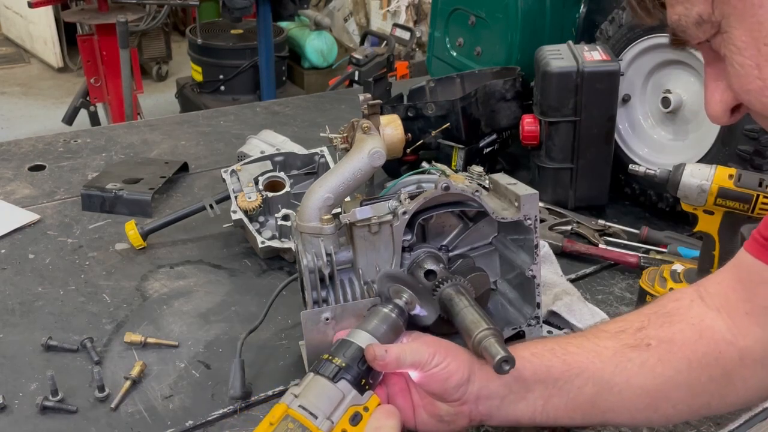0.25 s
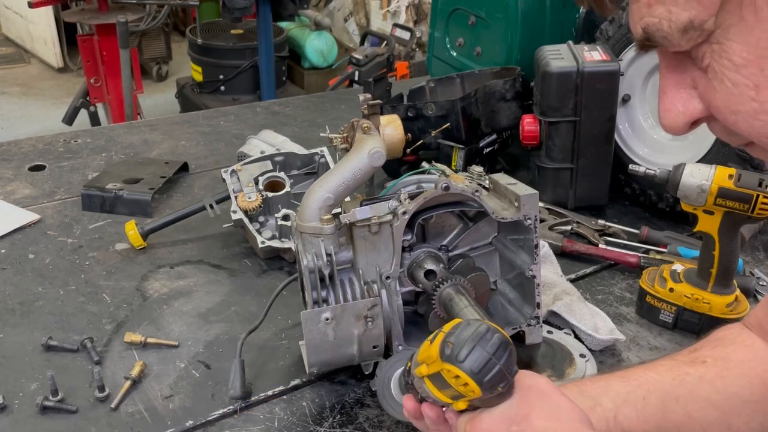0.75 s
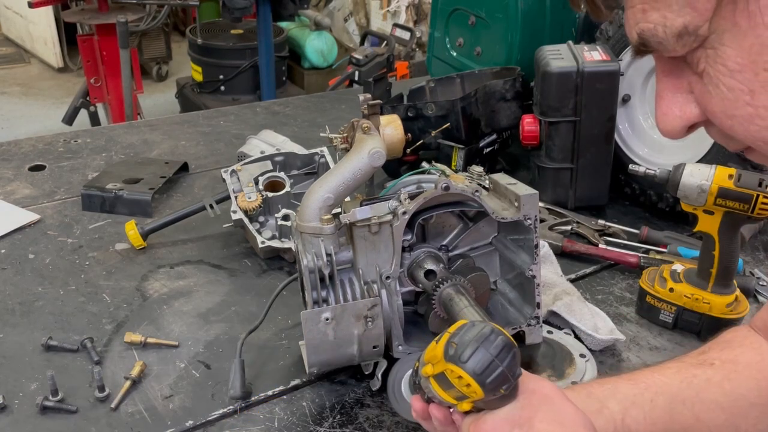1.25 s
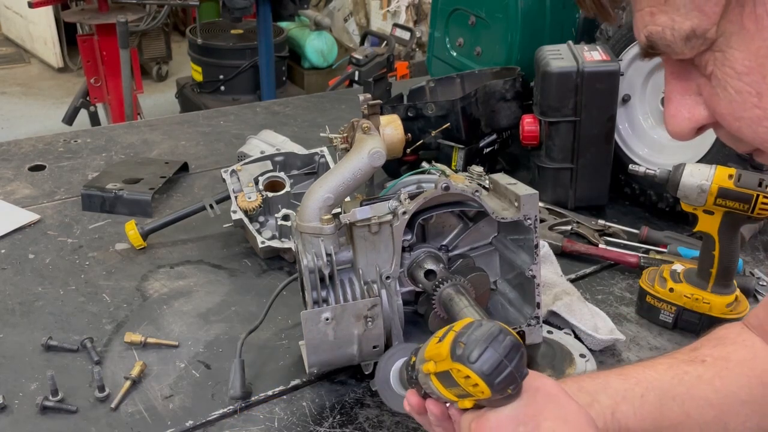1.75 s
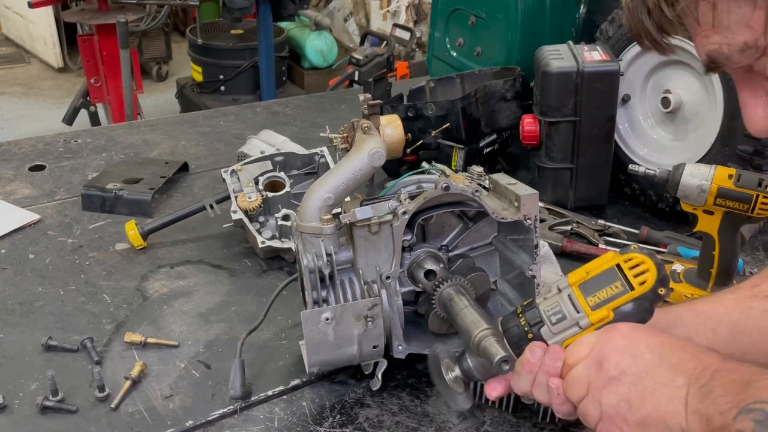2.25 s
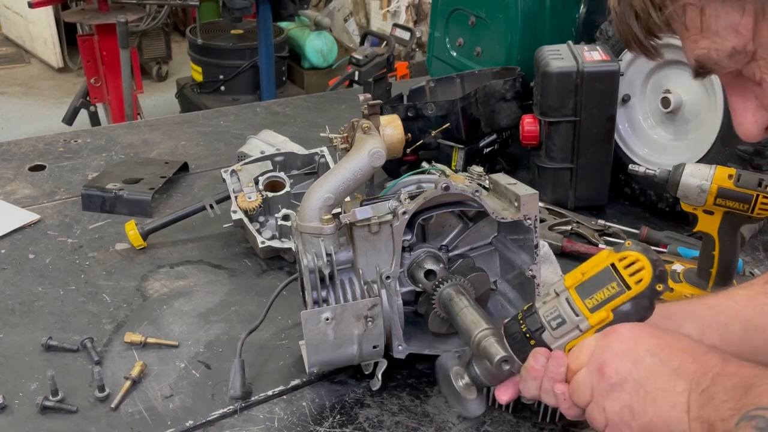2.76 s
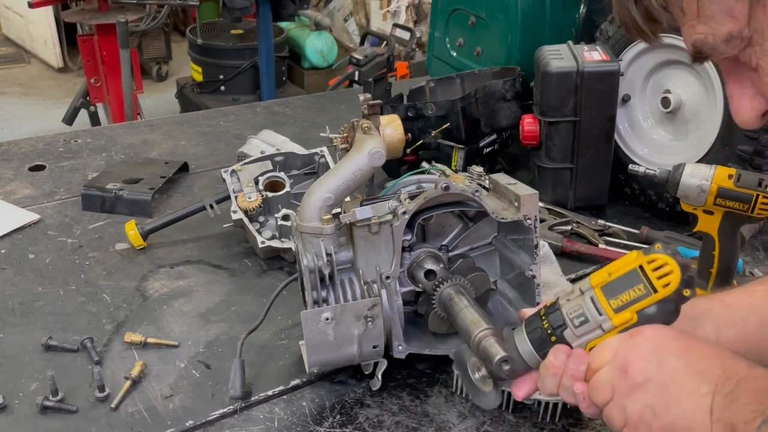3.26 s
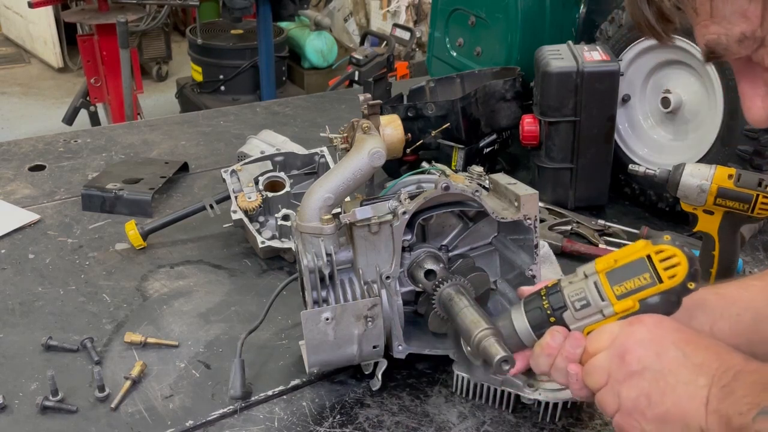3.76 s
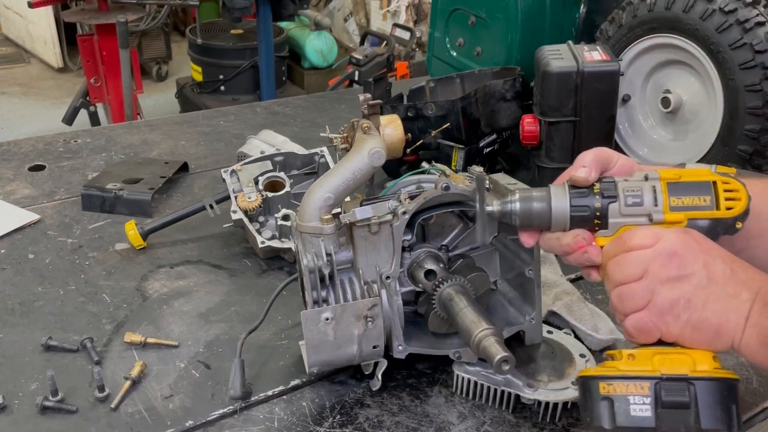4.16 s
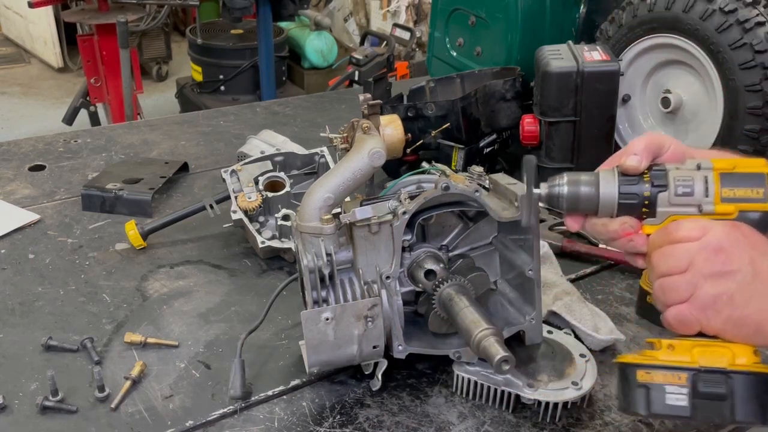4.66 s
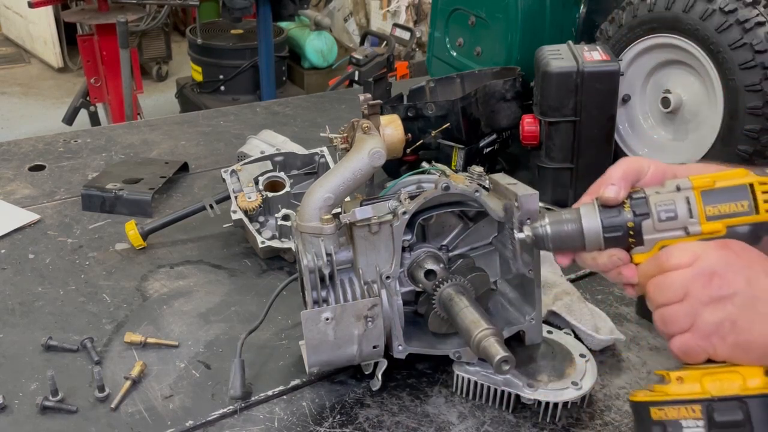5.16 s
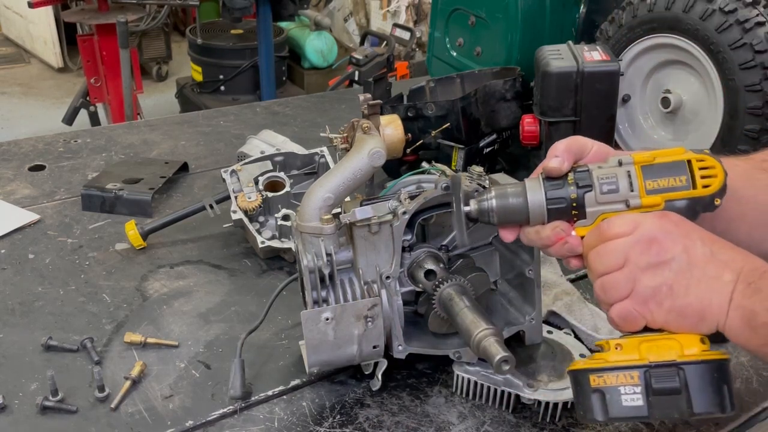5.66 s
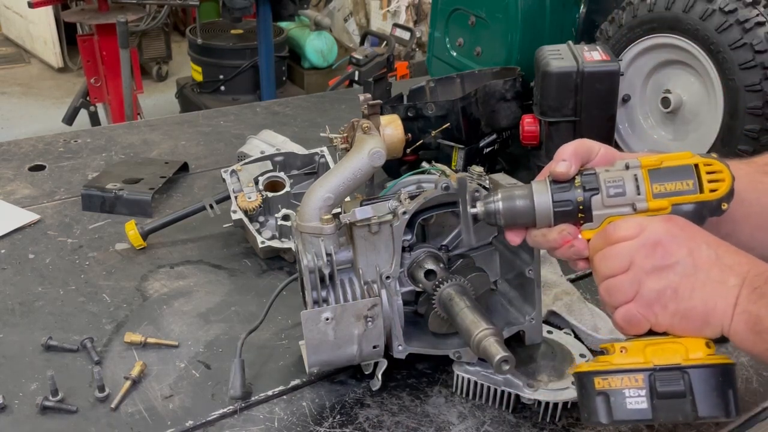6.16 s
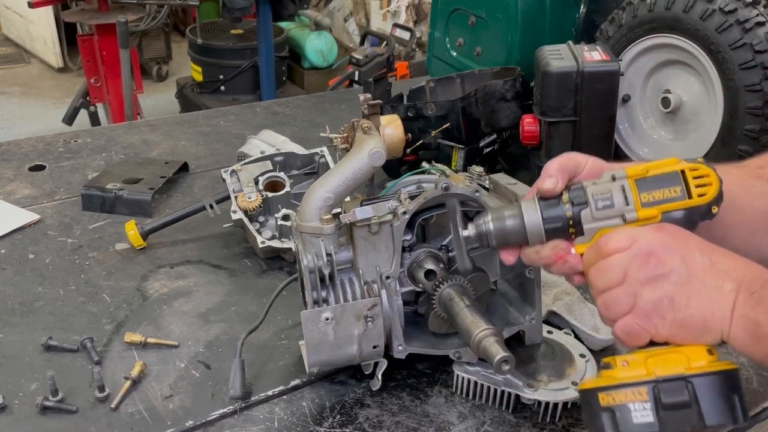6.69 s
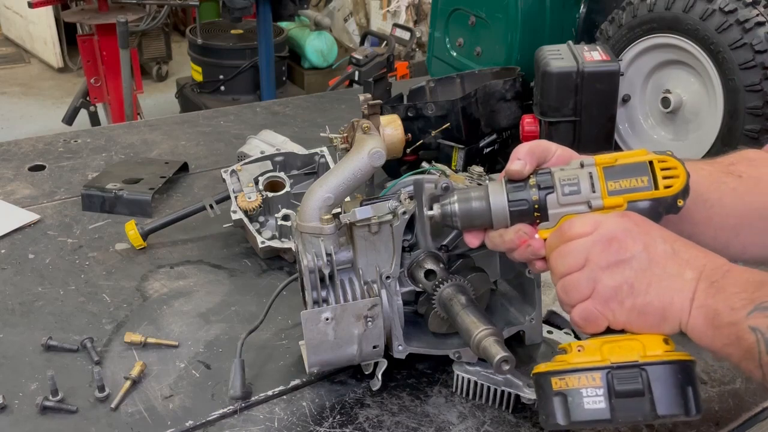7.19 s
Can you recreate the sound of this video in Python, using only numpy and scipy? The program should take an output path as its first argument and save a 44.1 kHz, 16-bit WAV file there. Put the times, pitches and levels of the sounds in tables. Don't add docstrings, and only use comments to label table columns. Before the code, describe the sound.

Close workshop sound of a whirring drill and raspy wire brush on metal, shifting in pitch and pressure, braking to near silence, then scrubbing again loudly.

```python
import sys
import numpy as np
from scipy import signal
from scipy.fft import rfft, irfft, next_fast_len
from scipy.io import wavfile
from scipy.ndimage import uniform_filter1d, map_coordinates

SR = 44100
rng = np.random.default_rng(int(sys.argv[2]) if len(sys.argv) > 2 else 0)


def how_loud(loudness_db):
    steps = np.asarray(loudness_db, float) / 20
    return 10 ** steps


def materialize(psi):
    bounded = np.clip(np.atleast_2d(psi).T, -1, 1)
    quanta = np.round(bounded * 32767).astype(np.int16)
    wavfile.write(sys.argv[1], SR, quanta)


N = 327663
TIME = np.arange(N) / SR
BEFORE_CUT_S, AFTER_CUT_S, BEFORE_NEXT_S, AFTER_NEXT_S = .3605, .3615, 2.1975, 2.1985

# (time [s], wire noise [dB], pressure [dB])
BRUSH = [
    [(0, -28, -18.5), (.15, -31, -20.5), (0.16, -33.5, -22.5), (BEFORE_CUT_S, -33, -24.5)],
    [(AFTER_CUT_S, -22, -7.5), (.5, -17, -15), (1.3, -15.5, -15.5), (1.62, -16.5, -18), (1.865, -18, -23),
     (2.02, -23, -18.5), (2.113, -26.5, -17), (BEFORE_NEXT_S, -32.5, -10)],
    [(AFTER_NEXT_S, -33, -14), (2.9, -33, -15), (3.04, -33.5, -10.5), (3.1, -32.5, -19), (3.42, -32, -15.5),
     (3.55, -32.5, -16), (3.77, -33, -10), (4.0, -33, -16.5), (4.09, -33.5, -12.5)],
    [(4.1, -32.5, -18), (4.48, -31.5, -16), (4.58, -33, -7.5), (4.72, -31.5, -12.5), (4.81, -32, -15.5),
     (4.96, -31.5, -20), (5.04, -37.5, -9.5)],
    [(5.582, -29.5, -11.5), (5.61, -29, -5), (5.635, -17, -14.5), (5.68, -13.5, -18.5), (6.0, -12.5, -17.5),
     (6.88, -13, -19.5), (7.1, -20, -20.5), (7.22, -23, -18.5), (7.43, -27.5, -18)],
]
# (time [s], rate [Hz])
SPEED = [
    [(0, 1263), (.1, 1238), (.2, 1334), (.28, 1431), (BEFORE_CUT_S, 1496)],
    [(AFTER_CUT_S, 700), (.385, 850), (.41, 925), (.5, 1090), (.6, 1232), (.68, 1300), (.9, 1310),
     (.96, 1294), (1.11, 1335), (1.22, 1326), (1.31, 1307), (1.5, 1324), (1.66, 1342), (1.8, 1350),
     (1.95, 1314), (2.07, 1285), (BEFORE_NEXT_S, 1262)],
    [(AFTER_NEXT_S, 1090), (2.3, 1090), (2.44, 1092), (2.53, 1048), (2.62, 1026), (2.8, 1003), (2.92, 970),
     (3.03, 948), (3.17, 1098), (3.27, 1200), (3.34, 1245), (3.42, 1225), (3.5, 1262), (3.6, 1318),
     (3.7, 1332), (3.78, 1315), (3.88, 1255), (4.09, 1320)],
    [(4.1, 1210), (4.3, 1170), (4.5, 1149), (4.6, 1066), (4.72, 1026), (4.77, 1114), (4.82, 1158),
     (4.87, 1107), (4.94, 985), (5.0, 895), (5.032, 850)],
    [(5.58, 415.5), (5.615, 640), (5.648, 925), (5.7, 1104), (5.75, 1215), (5.8, 1280), (5.87, 1337),
     (5.95, 1359), (6.4, 1359), (6.7, 1375), (6.9, 1420), (7.05, 1452), (7.2, 1424), (7.43, 1359)],
]
# (frequency [Hz], density [dB per Hz])
HANDLE_RUMBLE = [(20, -16), (60, -16.5), (150, -5), (300, -1.5), (520, 0), (700, -33.5)]
RATTLE = [(310, -33.5), (520, -11.5), (1340, -1.5), (1800, -9), (2220, -12), (2590, -4.5), (3300, -6),
          (3900, -5.5), (6600, -120)]
SCRUB = [(1180, -23.5), (2000, -11.5), (2270, -13.5), (2600, -2.5), (2890, -16.5), (3840, -4), (4660, -6),
         (5210, 2), (6600, 3.5), (10500, -6), (13600, -21), (22000, -120)]
WIRE_TIPS = [(5000, -49.5), (8500, -4.5), (10400, -4.5), (13800, 2), (14700, 6.5), (15300, 3.5),
             (15700, -10)]
SCRUB_OVER = [-1, -4, -7, -8, -6]
RUMBLE_OVER = [-30.5, -31, -27.5, -26.5, -33]
FROM_REST = [0, 1, 0, 0, 1]
# (echo [dB], t60 [s], floor [dB], creep of the squeezed trigger [dB])
PAUSE = [(-63, 0.32, -87.5, -74.5), (-58, 0.37, -87, -65.5), (-56, 0.33, -92, -64.5),
         (-49, 0.19, -101, -59)]
# (time [s], half length [s], frequency [Hz], width [Hz], share lost
THINNED = [(1.88, 0.32, 3200, 400, .6), (1.95, .3, 800, 270, .4), (0.64, 0.27, 4800, 500, .3),
           (2.3, 0.23, 2100, 560, 0.45), (1.78, .15, 1950, 300, .5), (7.28, .12, 3500, 400, .5),
           (7.36, .12, 2000, 350, .5), (7.1, .08, 700, 250, .5), (.29, .09, 10800, 1200, .4),
           (5.95, .15, 6100, 500, .3), (4.48, .12, 6300, 700, .3)]

GRIP = [(-39.5, -52, -41, -27, -40, -36), (-34, -36.5, -37, -32, -20.5, -29),
        (-41, -59, -39, -36.5, -45, -43), (-41.5, -43, -41.5, -40.5, -42.5, -47),
        (-37.5, -34.5, -36, -30.5, -35, -34)]
# (frequency [Hz], width [Hz], gain [dB])
HOUSING = [(941, 120, 14.5), (2700, 210, 4), (6700, 450, 5.5)]
# (time [s], half length [s], level [dB])
LOW_BITES = [
    [(.05, 0.14, -47), (.33, 0.042, -50), (.375, 0.015, -35), (.418, 0.04, -29), (.97, 0.14, -38.5),
     (2.75, 0.31, -42), (3.04, 0.073, -38), (3.45, 0.072, -44.5), (3.85, 0.088, -40.5), (4.68, 0.18, -37.5),
     (4.962, 0.065, -29), (2.33, 0.14, -48.5), (4.35, 0.19, -49), (5.66, 0.045, -30.5), (6.45, .5, -42),
     (7.28, 0.063, -38.5)],
    [(.03, 0.082, -41), (.39, 0.041, -34), (.47, .05, -40), (3.41, 0.18, -35.5), (3.64, 0.31, -42.5),
     (3.88, 0.17, -36), (4.44, .07, -54), (7.05, .35, -43.5)],
    [(.25, 0.11, -52), (.53, 0.14, -36), (2.3, 0.06, -52), (2.7, 0.27, -43), (2.92, 0.16, -38.5),
     (3.85, .09, -39), (4.2, 0.14, -43.5), (4.68, 0.095, -50), (5.69, .04, -35), (7.0, 0.22, -48),
     (7.2, .08, -44)],
]
HIGH_BITES = [
    [(.05, 0.13, -33), (.4, 0.026, -26), (1.76, 0.2, -26.5), (2.43, 0.14, -39.5), (2.87, 0.31, -39.5),
     (3.88, 0.067, -50), (4.68, 0.1, -33.5), (6.27, .1, -30), (6.9, .12, -38), (7.08, 0.1, -34),
     (7.3, .16, -39)],
    [(1.6, 0.78, -44), (2.95, 0.13, -37), (3.17, .09, -47), (3.3, 0.068, -42), (3.43, .09, -42),
     (3.7, .12, -47), (5.98, .08, -33), (5.81, 0.08, -24.5), (6.27, .12, -29)],
    [(.58, .09, -27), (2.4, 0.29, -39), (3.28, 0.046, -42), (2.7, .12, -45), (4.96, .05, -50),
     (4.82, 0.069, -33), (1.75, .2, -40), (1.1, .5, -34), (5.73, .07, -30)],
]
# (order [no unit], time [s], half length [s], level [dB])
HIGH_ORDERS = [(7, .415, 0.029, -30.5), (8, 0.52, .04, -33), (9, 2.55, .06, -43), (9, 2.82, 0.11, -45),
               (9, 3.1, .05, -43), (8, 3.3, .07, -44), (8, 3.69, 0.17, -37), (7, 5.69, .05, -32),
               (5, 5.66, .04, -32), (4, 5.65, .04, -33), (6, 5.92, .1, -33), (7, 4.95, .05, -46)]
# (level over the rattle [dB], width [Hz])
RIDGES = [(-8.5, 220), (-10, 240), (-8.5, 300)]
RIDGE_OVER = [0, -1, -1, -1, -5]
CHATTER_USUAL = [.75, .52, .47, .5, .5]

# (time [s], frequency [Hz], level [dB])
SWITCH = [
    [(0, 5176, -27.5), (.2, 5230, -29.5), (.356, 5285, -33)],
    [(.41, 5000, -35.5), (.458, 5135, -21), (.542, 5140, -23), (.672, 5102, -25), (.906, 5162, -24.5),
     (.946, 5131, -28), (1.004, 5140, -23.5), (1.05, 5085, -30), (1.19, 5134, -25.5), (1.35, 5100, -28),
     (1.385, 5050, -34), (1.522, 5190, -27), (1.7, 5120, -28), (1.842, 5151, -27.5), (2.028, 5200, -29),
     (2.08, 5110, -31), (2.19, 5070, -34.5)],
    [(2.42, 5080, -56), (2.606, 5100, -39.5), (2.83, 4980, -47), (2.87, 4970, -35), (3.05, 5020, -46),
     (3.124, 4920, -43), (3.27, 5040, -50), (3.45, 5040, -57)],
    [(3.85, 4870, -50), (3.92, 4950, -43), (4.02, 5000, -56), (4.3, 5030, -53)],
    [(4.46, 4720, -48), (4.54, 4800, -50), (4.6, 4960, -38), (4.655, 5020, -28), (4.71, 5100, -28),
     (4.77, 4960, -29), (4.79, 4950, -40)],
    [(5.68, 5010, -36.5), (5.75, 5155, -27.5), (5.86, 5210, -30), (5.92, 5170, -39), (6.3, 5083, -35.5),
     (6.6, 5100, -41.5)],
]
# (time [s], peak [dB], frequency [Hz], length [s])
SQUEEZE = [(5.531, -48, 5650, 0.004), (5.537, -41, 5420, 0.0044), (5.548, -28, 5500, 0.0026),
           (5.557, -36, 5920, 0.004), (5.565, -31, 5800, 0.004), (5.572, -37, 5550, 0.003),
           (5.581, -27.5, 5750, 0.0022), (5.587, -24.5, 5600, 0.0025), (5.595, -30, 6050, 0.003)]

# (time [s], half length [s], frequency [Hz], width [Hz],
# level [dB])
BAND_SWELLS = [(0.095, 0.15, 1440, 290, -44.5), (0.118, 0.14, 2660, 210, -43.5), (6.27, .09, 5400, 243, -29.5),
               (1.94, 0.11, 2200, 260, -42.5), (0.05, .15, 14400, 1100, -29.5), (.28, .09, 15000, 150, -43),
               (.04, .1, 8800, 440, -42), (2.56, 0.12, 4450, 160, -37.5), (1.1, .68, 930, 110, -40.5),
               (2.97, 0.13, 830, 230, -48), (.3, .1, 190, 40, -62.5), (3.45, 0.11, 560, 150, -59.5),
               (2.947, 0.14, 4207, 500, -37.5), (3.42, 0.11, 6100, 350, -38), (3.78, 0.16, 800, 90, -50),
               (5.66, 0.055, 3000, 450, -31), (.06, .11, 4500, 500, -36), (0.055, .1, 3300, 390, -42),
               (1.9, .2, 1300, 200, -41), (3.04, .04, 300, 200, -53), (4.99, .04, 800, 120, -40),
               (2.35, .08, 4300, 200, -41), (2.17, .04, 6300, 390, -34.5), (1.335, .022, 1250, 200, -30),
               (1.335, .03, 930, 80, -35), (1.63, .015, 900, 500, -35), (1.95, .25, 2480, 200, -39),
               (7.3, .16, 5500, 250, -38), (1.69, .03, 950, 100, -39), (5.64, .03, 4200, 500, -32),
               (.3, .07, 13400, 200, -40), (5.031, .012, 5800, 400, -36), (2.95, .2, 350, 150, -58),
               (1.95, .2, 450, 120, -52), (4.67, 0.15, 5150, 330, -29.5), (4.52, .07, 4850, 140, -38.5),
               (2.25, 0.092, 4240, 140, -34.5), (2.5, 0.042, 4230, 170, -34), (2.74, .08, 4100, 260, -39),
               (2.98, 0.14, 990, 45, -38.5), (5.39, .1, 1550, 160, -83), (5.268, 0.005, 1200, 900, -68),
               (6.42, 0.78, 3330, 250, -35)]
MID_HISS_OVER = [-20, -30.5, -14, -15.5, -19.5]

# (time [s], peak [dB], swing [Hz], half length [s])
PUFFS = [(0.61, -22, 50.8, 0.029), (0.644, -18.5, 100, 0.0049), (0.684, -29.5, 84.8, 0.0093),
         (0.722, -29, 53.6, 0.013), (0.806, -22, 120.8, 0.016), (0.895, -25, 75, 0.066),
         (1.036, -24.5, 105, 0.015), (1.093, -23, 45.3, 0.022), (1.187, -27, 50.8, 0.052),
         (1.347, -21.5, 76.8, 0.0073), (1.373, -28.5, 75, 0.003), (1.463, -31.5, 50.8, 0.025),
         (1.567, -38, 81, 0.017), (1.658, -42, 58.8, 0.016), (1.786, -29, 83.3, 0.008),
         (1.817, -26.5, 74.4, 0.023), (1.895, -31, 59, 0.019), (1.953, -31, 54.8, 0.022),
         (2.031, -31, 100, 0.018), (2.113, -22.5, 60, 0.035), (2.175, -23.5, 46, 0.017),
         (2.311, -43, 74.9, 0.029), (2.484, -46, 42.6, 0.014), (2.52, -49, 92.4, 0.0083),
         (2.41, -51, 70, 0.08), (1.52, -39, 60, 0.04), (1.26, -37, 50, 0.03), (1.76, -36, 50, 0.02)]

# (time [s], peak [dB])
KNOCKS = [
    (6.2, -22),
    (5.028, -26),
    (5.063, -39),
]
# (frequency [Hz], width [Hz], level [dB])
CASING = [(3000, 900, -9.5), (5840, 700, 1), (9600, 900, -5), (13500, 2500, -2.5)]
# (time [s], half length [s], level [dB])
JOLT = (5.03, 0.025, -33)
# (frequency [Hz], density [dB per Hz])
SHUDDER = [(60, -7), (200, 6), (500, -11), (1100, -7), (1800, -37)]

# (frequency [Hz], level [dB], t60 [s])
BENCH = [(33.3, 4.5, 1), (81, -14, 0.73)]
# (frequency [Hz], density [dB per Hz])
ROOM = [(18, 1), (50, 0.5), (110, -0.5), (250, -18.5)]
# (time [s], half length [s], level [dB])
LEAN = (4.6, 0.18, -58)
# (time [s], from [Hz], to [Hz])
SPLITS = [(0.188, 8900.0, 11100.0), (1.279, 6400, 7950), (1.698, 12900, 14620), (1.841, 5500, 7000.0),
          (3.443, 12400.0, 13760), (4.044, 8820, 12480), (4.93, 11920, 13070), (5.949, 13100, 15280),
          (6.32, 8920, 12470), (6.81, 10820, 12320), (7.017, 5710, 7700.0), (7.017, 8860, 11000),
          (7.411, 13700.0, 15600)]

STOP_S, SQUEEZE_S, START_S = 5.045, 5.527, 5.58
FULL_SPEED_HZ = 1300
USUAL_DB = -16


def unit(x):
    return x / np.sqrt(np.mean(np.abs(x) ** 2) + 1e-20)


def curves(tables):
    s, *cols = np.transpose(np.concatenate(tables))
    return [np.interp(TIME, s, c) for c in cols]


def sounding(tables, fade=.006):
    inside = sum((TIME >= rows[0][0] - fade) & (TIME < rows[-1][0] + fade) for rows in tables)
    return uniform_filter1d(1. * (inside > 0), round(fade * SR))


def per_shot(values):
    starts = [rows[0][0] for rows in SPEED[1:]]
    return np.asarray(values)[np.searchsorted(starts, TIME + .0005)].T


def swell(s, length, db):
    return how_loud(db) * np.clip(1 - ((TIME - s) / length) ** 2, 0, 1) ** 1.4


def wobble(rate, t=TIME):
    return map_coordinates(rng.standard_normal(int(N * rate / SR) + 4), [t * rate])


def filtered(x, response):
    m = next_fast_len(N + 8192)
    return irfft(rfft(x, m) * response(np.fft.rfftfreq(m, 1 / SR)), m)[:N]


def coloured(x, points):
    hz, db = np.transpose(points)
    return unit(filtered(x, lambda f: how_loud(np.interp(np.log(f + 1), np.log(hz), db, -120, -120))))


def patchy(depth_db):
    z = signal.stft(rng.standard_normal(N + 512), nperseg=512)[2]
    field = uniform_filter1d(uniform_filter1d(rng.standard_normal(z.shape), 6, 0), 10, 1)
    return signal.istft(z * how_loud(depth_db * unit(field)), nperseg=512)[1][:N]


def fuzzy(turns, clean, blur_hz, t=TIME):
    narrow = wobble(blur_hz, t) + 1j * wobble(blur_hz, t)
    wide = wobble(2.5 * blur_hz, t) + 1j * wobble(2.5 * blur_hz, t)
    skirt = unit(narrow + .7 * wide)
    share = np.clip(clean, 0, 1)
    envelope = np.sqrt(share) + np.sqrt(1 - share) * skirt
    return np.sqrt(2) * np.real(envelope * np.exp(2j * np.pi * turns))


def contact():
    wires_db, pressure_db = curves(BRUSH)
    extra_db = pressure_db - USUAL_DB
    octaves_db = 25 * np.log2(curves(SPEED)[0] / FULL_SPEED_HZ)
    rumble_db = per_shot(RUMBLE_OVER) + 0.65 * extra_db + octaves_db * per_shot(FROM_REST)
    scrub_db = per_shot(SCRUB_OVER) + 0.35 * extra_db
    running = how_loud(wires_db + [rumble_db, pressure_db, scrub_db, 0 * TIME])
    since = np.abs(TIME - STOP_S)
    paused = [how_loud(db - 60 * since / t60) + how_loud(np.where(TIME < SQUEEZE_S, floor_db, creep_db))
              for db, t60, floor_db, creep_db in PAUSE]
    gains = np.where((TIME > STOP_S) & (TIME < START_S), paused, running)
    return uniform_filter1d(gains, size=SR // 900, axis=1)


def brush(shaft):
    spectra = (HANDLE_RUMBLE, RATTLE, SCRUB, WIRE_TIPS)
    patches_db, flickers_db = (3.6, 2.0, 1.77, 1.4), (0.76, 1.1, 0.73, 0.74)
    throb_db = 0.45 * wobble(6.6) + 0.35 * wobble(27) + 0.25 * np.cos(2 * np.pi * shaft)
    out = 0
    for gain, spectrum, patch_db, flicker_db in zip(contact(), spectra, patches_db, flickers_db):
        strikes = patchy(patch_db) * how_loud(flicker_db * wobble(900))
        out = out + gain * how_loud(throb_db) * coloured(strikes, spectrum)
    lost = 0
    for s, length, hz, width_hz, share in THINNED:
        band = filtered(out, lambda f: np.exp(-((f - hz) / width_hz) ** 2))
        lost = lost + share * swell(s, length, 0) * band
    return out - lost


def gears(teeth, unsteady):
    rate, = curves(SPEED)
    wires_db, pressure_db = curves(BRUSH)
    speed = rate / FULL_SPEED_HZ
    chatter = np.clip(per_shot(CHATTER_USUAL) + .05 * (pressure_db - USUAL_DB), .2, .9)
    chatter = chatter * np.clip(speed, 0, 1) ** (4 * per_shot(FROM_REST))
    turns = np.cumsum(rate * (1 + unsteady * wobble(25) + .0025 * wobble(7))) / SR
    stiffness = [1.5, .75, .55, .75, 1.0, .85]
    blur_hz = [105, 175, 200, 250, 190, 260]
    orders = 0
    for k, (grip_db, bites) in enumerate(zip(per_shot(GRIP), LOW_BITES + HIGH_BITES)):
        order_hz = (k + 1) * rate
        housing_db = sum(db / (1 + ((order_hz - hz) / width) ** 2) for hz, width, db in HOUSING)
        steady = how_loud(grip_db + 0.46 * wires_db + housing_db) * speed ** 3.5
        level = steady + sum(swell(*bite) for bite in bites)
        drift = how_loud(1.5 * wobble(16))
        orders = orders + level * drift * fuzzy((k + 1) * turns, stiffness[k] * (1 - chatter), blur_hz[k])
    for k, (db, width_hz) in enumerate(RIDGES):
        level = how_loud(wires_db + pressure_db + db + per_shot(RIDGE_OVER)) * speed ** 2
        orders = orders + level * fuzzy((k + 1) * turns, 0, width_hz)
    for order, *bite in HIGH_ORDERS:
        orders = orders + swell(*bite) * fuzzy(order * turns, .3, 300)
    return sounding(SPEED) * orders, turns / teeth


def switch():
    hz, db = curves(SWITCH)
    turns = np.cumsum(hz + 6 * wobble(30)) / SR
    out = sounding(SWITCH, .004) * how_loud(db + 1.2 * wobble(22)) * fuzzy(turns, .93, 50)
    closing = slice(round(5.5 * SR), round(5.62 * SR))
    t = TIME[closing]
    for s, peak_db, chirp_hz, length in SQUEEZE:
        envelope = how_loud(peak_db) * np.exp(-((t - s) / length) ** 2)
        out[closing] += envelope * fuzzy(chirp_hz * t, .8, 250, t) / np.sqrt(2)
    return out


def band_swells():
    out = how_loud(per_shot(MID_HISS_OVER)) * contact()[-1] * fuzzy(4500 * TIME, 0, 600)
    for s, length, hz, width_hz, db in BAND_SWELLS:
        near = np.abs(TIME - s) < length
        t = TIME[near]
        level = how_loud(2.0 * wobble(30, t)) * swell(s, length, db)[near]
        out[near] += level * fuzzy(hz * t, 0, width_hz, t)
    return out


def fan_air(stretch, hiss):
    out = np.zeros(N)
    eddies = coloured(rng.standard_normal(N), [(25, -2.5), (70, -3.0), (150, -9.0), (300, -26.5), (500, -50.0)])
    for s, db, hz, length in PUFFS:
        t = TIME - s
        envelope = how_loud(db) * np.exp(-(t / (stretch * length + 0.0059)) ** 2)
        swing = np.sin(2 * np.pi * (hz * t + rng.random()))
        out += envelope * (swing + hiss * eddies)
    return out


def brake():
    def bump(s, width):
        return np.exp(-((TIME - s) / width) ** 4)

    def ring(f):
        return sum((-1) ** k * how_loud(db) * 1j * f * width / (hz * hz - f * f + 1j * f * width)
                   for k, (hz, width, db) in enumerate(CASING))

    push = -how_loud(-13) * bump(5.0225, .0052) + how_loud(-17) * bump(5.0295, .002)
    shudder = swell(*JOLT) * coloured(rng.standard_normal(N), SHUDDER)
    blows = sum(how_loud(db - 60 * np.abs(TIME - s) / 0.029) * (TIME > s - .002) for s, db in KNOCKS)
    return push + shudder + filtered(blows * rng.standard_normal(N), ring)


def room_tone():
    paused = (TIME > STOP_S) & (TIME < START_S)
    since = np.abs(TIME - STOP_S)
    boom = how_loud(-57.5 - 60 * since / 0.61) + how_loud(-79)
    level = uniform_filter1d(np.where(paused, boom, how_loud(-68) + swell(*LEAN)), size=SR // 50)
    ring = sum(how_loud(-55 + db - 60 * since / t60) * np.sin(2 * np.pi * hz * since) for hz, db, t60 in BENCH)
    return level * coloured(rng.standard_normal(N), ROOM) + (TIME > STOP_S) * ring


def scene():
    whine, shaft = gears(teeth=22, unsteady=0.00202)
    mono = brush(shaft) + whine + switch() + band_swells()
    mono = mono + fan_air(stretch=0.65, hiss=.95) + brake() + room_tone()
    return np.array([mono, mono])


def top_cut(x):
    return signal.sosfilt(signal.butter(12, 16730, fs=SR, output="sos"), x)


def record(dry):
    limited = dry[0] / (1 + np.abs(dry[0] / .85) ** 4) ** (1 / 4)
    mono = filtered(limited, lambda f: f < 15750)
    stale = np.roll(mono, 3000)
    side = 0
    for s, low_hz, high_hz in SPLITS:
        window = np.cos(np.pi * np.clip((TIME - s) / .046, -.5, .5))
        side = side + window * filtered(stale, lambda f: (f > low_hz) & (f < high_hz))
    return top_cut(np.array([mono + .9 * side, mono - .55 * side]))


dry = scene()
out = record(dry)
materialize(out)
```